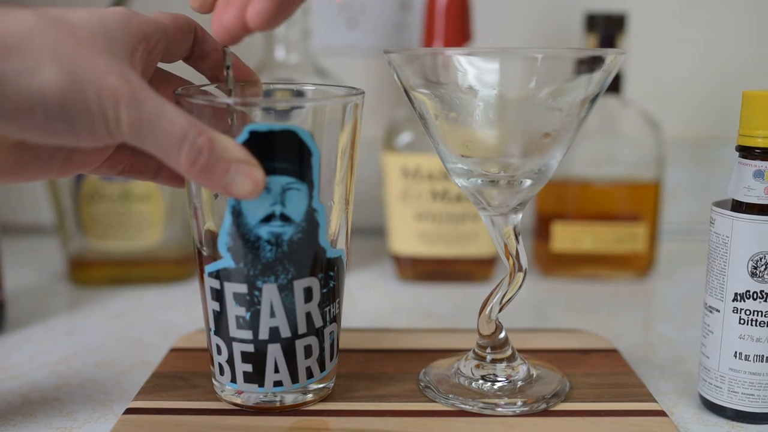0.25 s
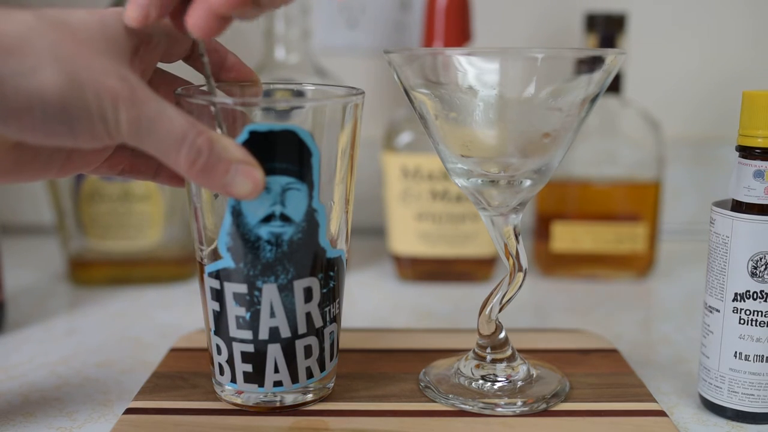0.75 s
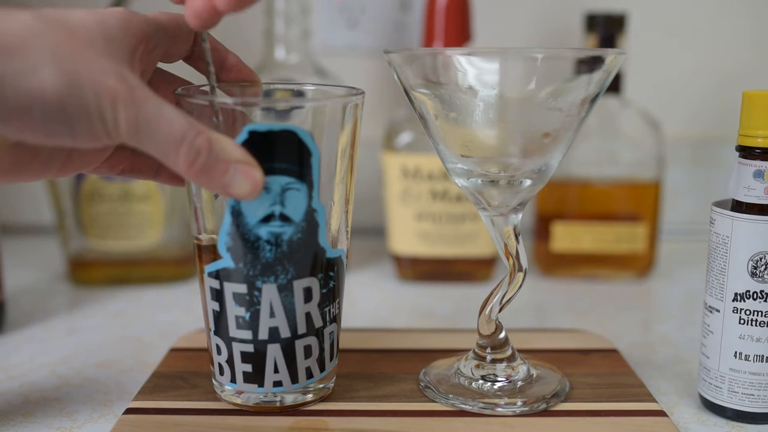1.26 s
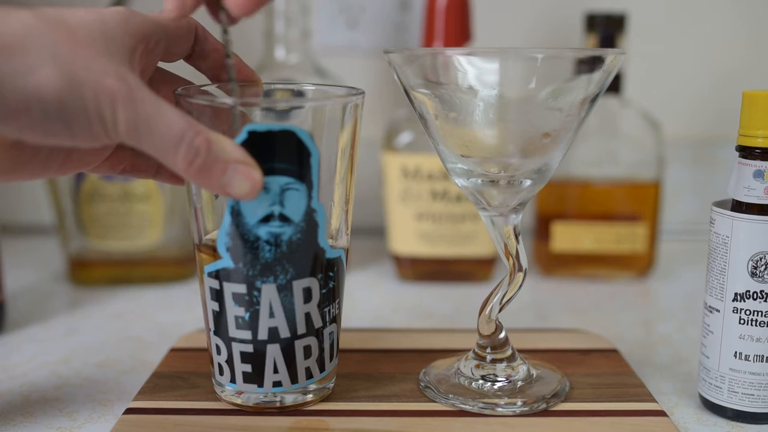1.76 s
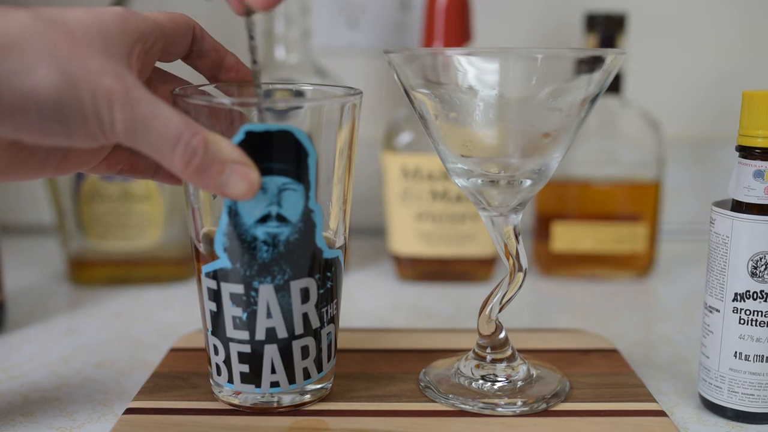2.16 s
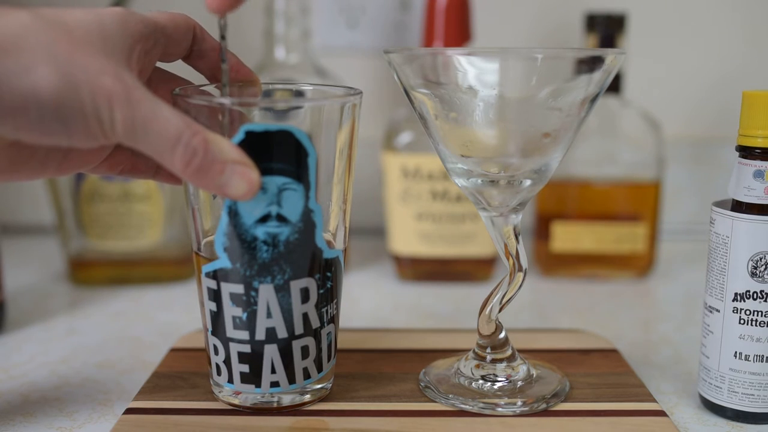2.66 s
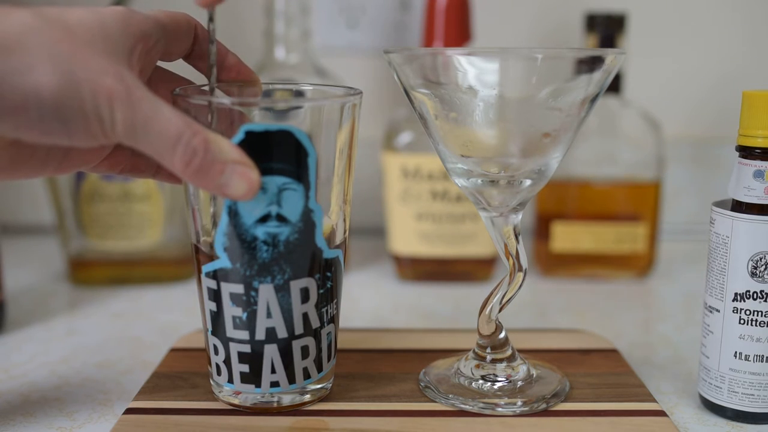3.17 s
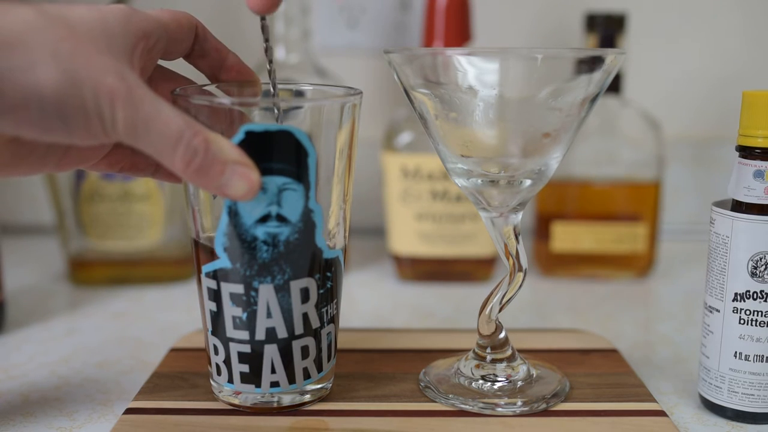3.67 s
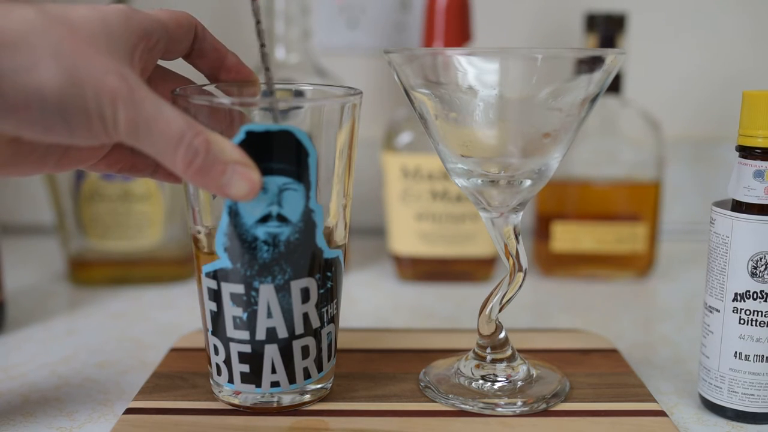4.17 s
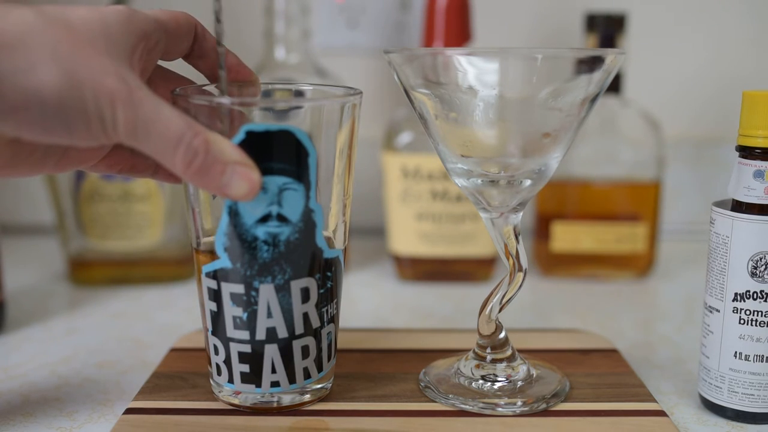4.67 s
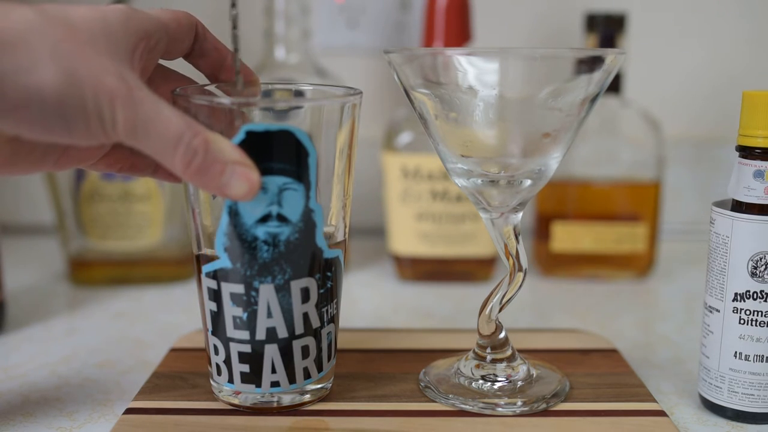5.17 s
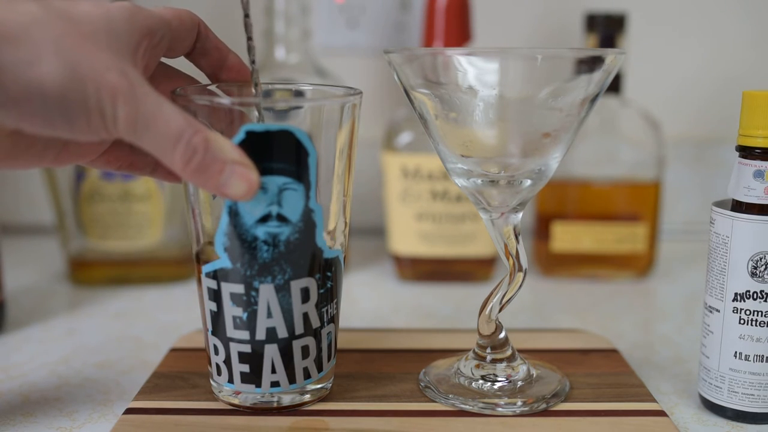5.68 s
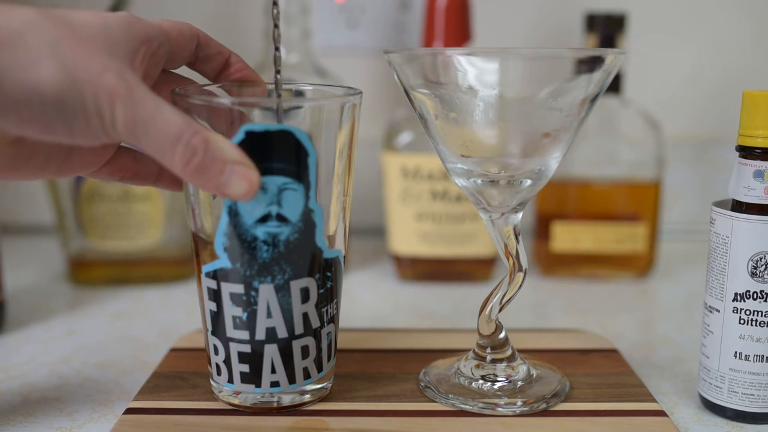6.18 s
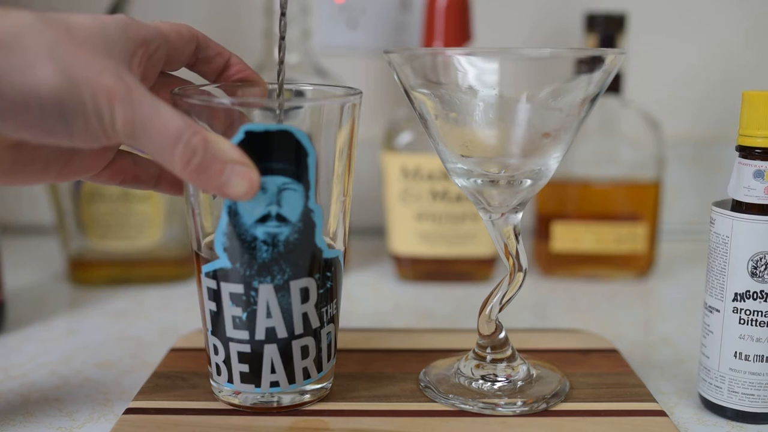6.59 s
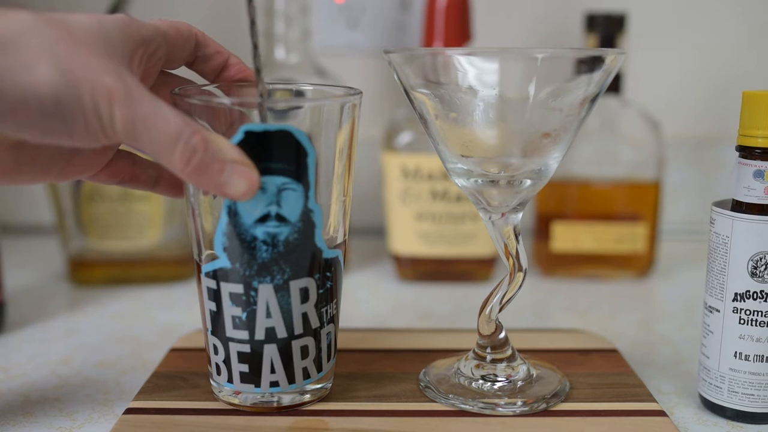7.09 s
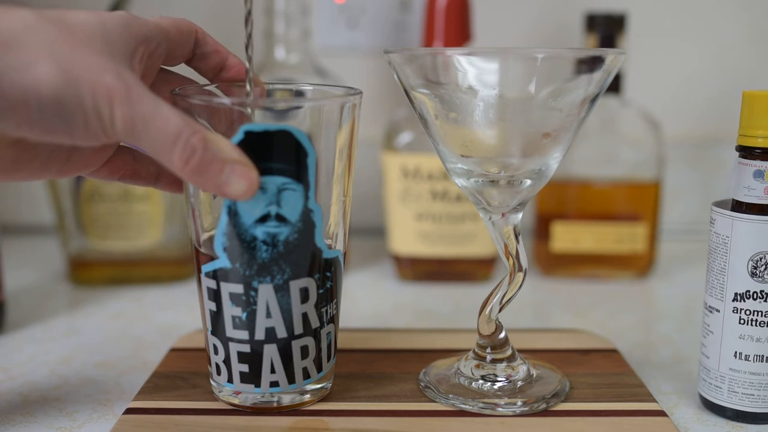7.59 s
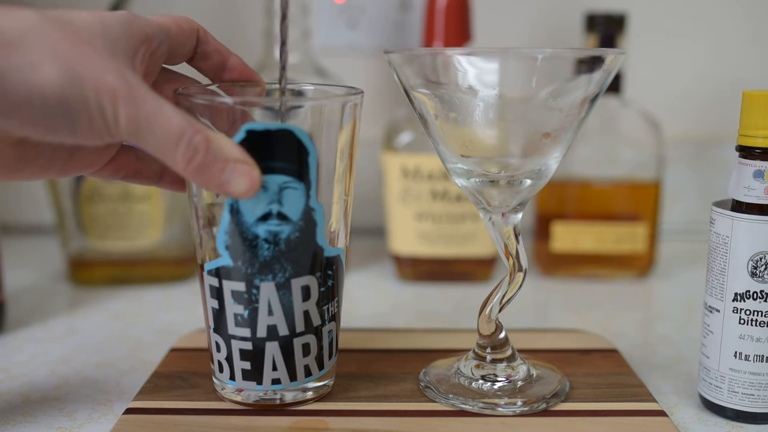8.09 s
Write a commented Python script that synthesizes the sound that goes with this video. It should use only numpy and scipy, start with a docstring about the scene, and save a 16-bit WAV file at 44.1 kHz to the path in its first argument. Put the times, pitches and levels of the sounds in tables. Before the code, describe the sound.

Continuous stirring of ice cubes with a metal spoon: crisp, high clinks on damped glass, fine chattering ticks between cubes, dull little bumps on wood and a few tiny bubble pops. The rhythm is uneven and quick, briefly thinning early on, with the loudest cracks in the last two seconds. Heard close in stereo, in a small reflective room with a short tail and faint hush.

```python
"""In a small hard-walled room, a bar spoon stirs ice cubes in a drink; a hand holds the thick glass on a wooden board.
Each contact cracks, rings the liquid-damped wall of the glass and jolts the board: force spectra drive resonances.
In between, chips tick on the glass and cubes on each other, as random clicks and short decaying sines.
A few air bubbles pop as decaying, rising sines, over a steady hush of coloured noise.
A stereo camera microphone is near; noise tails give the room's answer."""
import sys
import numpy as np
from scipy import signal
from scipy.fft import rfft, irfft, next_fast_len
from scipy.io import wavfile
from scipy.ndimage import uniform_filter1d, minimum_filter1d

SR = 44100
rng = np.random.default_rng(int(sys.argv[2]) if len(sys.argv) > 2 else 0)


def bounce(signal):
    """Save signal as a 16-bit WAV file at the path given by the first command-line argument."""
    frames = np.transpose(np.atleast_2d(signal))
    limited = np.clip(frames, -1, 1)
    pcm = np.round(limited * 32767).astype(np.int16)
    wavfile.write(sys.argv[1], SR, pcm)


N = 367794
SIZE = 2 ** 14  # samples in a response
T = np.arange(SIZE) / SR
HZ = np.fft.rfftfreq(SIZE, 1 / SR)

# ice and spoon against the glass: start_s, strength_db, hardness (dB per octave), bump on the board (dB over strength),
# main ring (dB over strength, set by the place struck), main ring pitch_hz (set by the sloshing drink)
CONTACTS = [(0.0556, -41, -8, 7, -7, 4630), (0.1166, -19.0, 3, -7.5, 1.5, 4975),
            (0.276, -21, -3.0, -17.5, 0, 4690), (0.3121, -32.0, -3.5, -18, 0, 4740),
            (0.3823, -35, -4, 1, 6, 4550), (0.4925, -30.5, -3.5, -9.5, 4.5, 4640),
            (0.625, -39.5, -2.5, 5.5, -1, 4680), (0.7347, -51.5, -4, 7, 0, 4750),
            (0.789, -46.5, -8.5, 4.5, 12.5, 4780), (0.8985, -29, -6, -6, 9, 4720),
            (0.9335, -37.5, -10, 3, 2, 4970), (0.9591, -23.5, -3.5, 0.5, 7.5, 4970),
            (1.0444, -21.5, -0.5, -10, 12.5, 4895), (1.0592, -24, -1, -6.5, 1, 4840),
            (1.0744, -31, 0, -25, 0, 4760), (1.1748, -27, -3, -22, 7, 4850),
            (1.223, -19, -1.5, -14, -5, 4700), (1.3269, -32, -2, -4.5, -4, 4700),
            (1.5126, -48.5, -9, -8, 7, 4760), (1.6145, -37.5, -6.5, -1, -17, 4860),
            (1.7274, -35.5, 3.5, -12, 1, 4650), (1.7624, -25, 8, -0.5, -5, 4650),
            (1.8205, -21.5, 4.5, -10, -10, 4600), (2.042, -17.5, 5.5, -8, -4, 4770),
            (2.3495, -31.5, 1.5, -4, 0.5, 4580), (2.3897, -29.0, 0.5, -12.5, -6, 4760),
            (2.457, -36, -4.5, -28, 3.5, 4470), (2.4923, -22, 5.5, -1, -10, 4600),
            (2.5715, -21, 4, -10, -3.5, 4490), (2.745, -54, -2, 6, -13, 4600),
            (2.8054, -24, -4, -33.5, -17, 4650), (2.869, -16.5, 8.5, -14.5, 13, 4873),
            (2.8856, -31.5, 2, -2.5, 12, 4640), (2.9556, -22, 8, -2.5, -3, 4610),
            (2.9793, -24, 8, -7, 1.5, 4560), (3.057, -29.5, 8.0, -12.5, -3, 4800),
            (3.247, -32.5, 5, -12, -9, 4800), (3.2667, -20, -1.5, -31, -3, 4730),
            (3.291, -38, -7, -8, -17, 4670), (3.3141, -16.5, 4.5, -8, -5.5, 4660),
            (3.33, -24.5, 0.5, -19, -13, 4600), (3.445, -22.5, 5, -11.5, -3.5, 4720),
            (3.6416, -31, 2, -17, 5.5, 4830), (3.6565, -19.5, 5, -7.5, -15, 4870),
            (3.7942, -36.5, 7.5, -5.5, -1, 4570), (3.8436, -20.0, 6.5, -15, -2.5, 4490),
            (4.0346, -21, 2, -11.5, 1, 4710), (4.063, -31, -1, 0.5, -1, 4800),
            (4.0778, -21.0, 0, -14, 1, 4720), (4.1367, -22.5, 1.5, -4, 0.5, 4890),
            (4.212, -21.5, 4, -13.5, -10, 4770), (4.2426, -30.5, 1, -10, -6, 4630),
            (4.3704, -40, 7.5, -4.5, -3, 5000), (4.421, -20.5, 4, -11.5, 1, 4770),
            (4.463, -18, 5, -27, -2, 4750), (4.5025, -24.5, 0, 0.5, -15, 4800),
            (4.614, -21, 6.0, -11, -4.5, 4560), (4.7673, -39, -5.5, -11, 3.5, 4640),
            (4.7997, -23, 1, -19.5, 1.5, 4650), (4.856, -32.5, -3, -12, 4, 4450),
            (4.8817, -33.5, -2, -9, -5, 4560), (4.925, -24, 5.5, -1.5, -5, 4450),
            (5.0102, -21, 8.5, -10, -4.5, 4340), (5.1348, -36.5, 5, -8, -1, 4700),
            (5.1828, -30.0, 3.5, -7.5, 3, 4750), (5.2191, -23.5, -1, -9.5, 4, 4630),
            (5.2803, -21.5, 5, 1.5, -3, 4830), (5.3819, -17, 6, -8, 2.5, 4590),
            (5.5079, -35.0, -2.5, -8, -16, 4430), (5.593, -22.5, 6, -8, 3.5, 4810),
            (5.6126, -31.5, 7, 9, -11, 4800), (5.6805, -39.5, 1, 6, 9, 4670),
            (5.6962, -36.5, -1, 2, 4, 4400), (5.7208, -22.5, 2, -5.5, -3, 4580),
            (5.8504, -27, -1.5, -5, 3, 4740), (5.9712, -16.0, 14.5, -12.5, -2.5, 4660),
            (6.0898, -39, -4.5, -11, 1, 4700), (6.1418, -40, 0.5, -6, 2.5, 4420),
            (6.223, -36.5, -2.5, -5.5, -2, 4730), (6.295, -29.5, 2.0, -7.5, -1, 4590),
            (6.3706, -49, -9.5, -1, -34, 4580), (6.5878, -9, 4, -25, -1, 4720),
            (6.7491, -24.5, -2, -20, 0, 4600), (6.8068, -32, -1.5, -7.5, 0, 4700),
            (6.8318, -29.5, 1, -9, -4, 4810), (6.8549, -36, -0.5, -1, 14.5, 4590),
            (6.9294, -20.5, 4, 4, -0.5, 4790), (6.9832, -24.5, 0.5, -23, -4, 4530),
            (7.0052, -33, -5, -17, 9.5, 4740), (7.039, -26.5, 1.5, 0.5, 8, 4980),
            (7.0684, -24.5, -3, -27, 3.5, 4760), (7.1066, -26.5, 1, -10, 7.5, 4750),
            (7.1618, -34, -3, -9, 0, 4650), (7.182, -26.5, 0.5, -15.5, -1, 4650),
            (7.269, -33, -5.5, -5, -0.5, 4800), (7.377, -11, 5.5, -22.5, 0.5, 4725),
            (7.4394, -31, 1, -12, 6, 4790), (7.4875, -32, -3.5, -5, 4.5, 5000),
            (7.567, -37, -2, 8, -2, 4800), (7.675, -22.5, 3, -11.5, -6, 5220),
            (7.7305, -24.5, 5.5, 1, -1.5, 5000), (7.791, -25, 1.5, -31, 0.5, 4700),
            (7.838, -24, -0.5, -16, -6, 4840), (7.882, -22.5, 3.5, -9, -6, 4630),
            (7.9162, -29.5, 5, -4.5, -1.5, 4720), (8.0066, -33, -5, -15, -2, 4880),
            (8.0428, -26.5, 7.5, -16, -0.5, 4900), (8.055, -30.5, -5.5, -16, 14, 4620),
            (8.1322, -27, -4.5, -24, -2, 4850), (8.1737, -9.5, 3, -30, 4.5, 4754),
            (8.2068, -27, 1.5, -4, -4, 4870), (8.253, -23.5, 6.5, -30, -8, 4780),
            (8.2825, -41, 1, 11.5, -17, 4740), (8.2974, -39.5, -5, -7, 6, 4640)]
# the glass standing on the board: mode_hz, width_hz, level_db
BOARD_MODES = [(219.6, 30.5, 4.5), (372, 38, 6), (529.5, 58, 2), (858.5, 71, 4), (1070, 190, -9.5)]
# brief resonances of the cubes and spoon in the drink: mode_hz, width_hz, level_db
ICE_MODES = [(2343, 46, -1), (3003, 116, -2), (3920, 760, -9.5), (5170, 200, 0.5), (6700, 220, -8)]
# colour of the contact itself: frequency_hz, level (dB per Hz)
CRACK_COLOUR = [(500, -7), (1300, -2.5), (2300, -6), (3000, 1.5), (4200, -3), (5800, -3), (7500, -67),
                (12000, -71)]
# stereo width of room sound: frequency_hz, side over mid (ratio)
STEREO_WIDTH = [(150, 0.17), (600, 0.4), (2000, 0.72), (5000, 1)]


def amp(db):
    """Decibels to gain."""
    return 10 ** (np.asarray(db) / 20)


def unit(x):
    """Scale to rms 1."""
    return x / np.sqrt(np.mean(x ** 2) + 1e-20)


def along(points, hz):
    """Read (Hz, value) points on a log frequency axis."""
    point_hz, value = np.transpose(points)
    return np.interp(np.log(hz + 1), np.log(point_hz + 1), value)


def filtered(x, response):
    """Filter x by a response given as a function of frequency."""
    m = next_fast_len(N + SIZE)
    return irfft(rfft(x, m) * response(np.fft.rfftfreq(m, 1 / SR)), m)[..., :N]


def colour(points):
    """Causal response with the gain of (Hz, dB) points, by folding the cepstrum (minimum phase)."""
    cepstrum = irfft(np.log(amp(along(points, HZ))))
    cepstrum[1:SIZE // 2] *= 2
    cepstrum[SIZE // 2 + 1:] = 0
    return np.exp(rfft(cepstrum))


def resonance(hz, width):
    """Causal response of one mode, with its centre and width in Hz."""
    return 1j * HZ * width / (hz ** 2 - HZ ** 2 + 1j * HZ * width)


def modes(table, detune, scatter_db):
    """One response per contact: the sloshing level detunes the modes, the point of contact weights them."""
    draw = rng.standard_normal((len(CONTACTS), len(table) + 1))
    shift = 1 + detune * draw[:, -1:]
    total = 0
    for k, (hz, width, db) in enumerate(table):
        gain = (-1) ** k * amp(db + scatter_db * draw[:, k:k + 1])  # neighbours alternate in sign
        total = total + gain * resonance(hz * shift, width)
    return total


def room(count, centre_hz, wet_db, early_db=0, early_t60=0.06, gap=0.00048, lag=.00001):
    """Paths to the left and right microphone: direct sound, counter and near walls, then the room's tail (times in s)."""
    # reverberation: frequency_hz, t60_s
    reverb_times = [(400, 0.49), (1000, 0.15), (2800, 0.26), (7300, 0.18), (13000, 0.17)]
    tail = amp(-60 * T / along(reverb_times, centre_hz))
    early = amp(-60 * T / early_t60)
    decay = np.hypot(tail / np.linalg.norm(tail), amp(early_db) * early / np.linalg.norm(early))
    decay = (amp(wet_db) * decay * (1 - np.exp(-T / gap))).astype(np.float32)
    noise = rng.standard_normal((count, 2, SIZE), dtype=np.float32)
    mid, side = rfft(noise * decay).transpose(1, 0, 2)
    side = side * along(STEREO_WIDTH, HZ).astype(np.float32)
    direct = np.exp(2j * np.pi * HZ * lag).astype(np.complex64)  # left hears it slightly before right
    return np.stack([direct + mid + side, direct.conj() + mid - side], axis=1)


def contact_levels():
    """dB of knock, crack, splinter and three wall rings: a harder contact is shorter and tilts towards the treble."""
    # crack, splinter, oval and four-lobe ring: centre_hz, level (dB over strength)
    contact_sounds = [(3240, 1.5), (8960, -9.5), (1810, -1.5), (7380, -3)]
    pivot_hz = 4800  # hardness tilts the sound about this frequency
    crack_from_bump = 0.36  # share of the bump's dB that goes into the crack of the ice
    _, strength_db, hardness, bump_db, ring_db, _ = np.transpose(CONTACTS)
    crack_db, splinter_db, oval_db, four_db = [
        strength_db + db + hardness * np.log2(hz / pivot_hz) for hz, db in contact_sounds]
    crack_db = crack_db + crack_from_bump * bump_db
    return strength_db + bump_db, crack_db, splinter_db, oval_db, strength_db + ring_db, four_db


def crowding(memory_s):
    """How hard the cubes press together: it swells before and fades after each contact, most for strong cracks."""
    start_s, crack_db = np.transpose(CONTACTS)[0], contact_levels()[1]
    time = np.arange(N) / SR
    coarse = time[::256]
    swell = np.exp(-np.abs(coarse[:, None] - start_s) / memory_s)
    return np.interp(time, coarse, swell @ np.sqrt(amp(crack_db)))


def room_tone(level_db=-50.0, side_db=-4):
    """The steady low hush of the room: coloured noise, nearly mono in the bass."""
    # hush colour: frequency_hz, level (dB per Hz)
    hush_colour = [(20, -3.5), (115, 0), (165, -5), (240, 0), (600, -11.5), (2000, -15), (5000, -24),
                   (15800, -32.5)]
    mid = filtered(rng.standard_normal(N), lambda hz: amp(along(hush_colour, hz)))
    side = filtered(rng.standard_normal(N), lambda hz: amp(along(hush_colour, hz)) * along(STEREO_WIDTH, hz))
    side = amp(side_db) * side
    return amp(level_db) * unit(np.array([mid + side, mid - side]))


def bubbles(t60=.085, rise=0.0032, level_db=-1, climb_per_s=0.34):
    """Trapped air rings briefly; its pitch climbs a little as it nears the surface (t60 and rise in s)."""
    # air bubbles under the ice: start_s, level_db (level_db of the layer is added), starting pitch_hz
    bubble_events = [(1.014, -23.5, 1670), (1.827, -21.5, 1120), (1.8687, -19, 1124), (1.962, -37, 1080),
                     (4.193, -28.5, 1100)]
    out = np.zeros(N + SIZE)
    swell = amp(-60 * T / t60) * (1 - np.exp(-T / rise))
    swell = swell / swell.max()
    for start_s, db, hz in bubble_events:
        ring = np.sin(2 * np.pi * hz * T * (1 + climb_per_s * T / 2))
        out[round(start_s * SR):][:SIZE] += amp(db + level_db) * swell * ring
    return out[:N]


def cubes(count=300, pitch_hz=3700, spread=.28, cycles=20, scatter_db=4, level_db=-6, size=512):
    """Cube meets cube away from the wall: very short ticks, each at its own pitch, that leave the glass silent."""
    start = rng.integers(0, N, count)
    draw = np.clip(rng.standard_normal((count, 4)), -2, 2)
    t = T[:size]
    hz = pitch_hz * np.exp(spread * draw[:, :3, None])  # three modes a tick
    fade = amp(-60 * hz * t / cycles)  # 60 dB down after this many cycles
    ticks = np.sum(np.sin(2 * np.pi * hz * t) * fade, axis=1) / 3
    gain = amp(level_db + scatter_db * draw[:, 3]) * crowding(memory_s=0.044)[start] ** 1.49
    ticks *= gain[:, None]
    place = start[:, None] + np.arange(size)
    train = np.bincount(place.ravel(), ticks.ravel(), N + size)[:N]
    paths = irfft(room(count=1, centre_hz=3600, wet_db=-8.5)[0])
    return signal.fftconvolve(train[None], paths, axes=1)[:, :N]


def chips(per_second=46, scatter_db=12.0, crowd_db=-21, idle_db=-49, memory_s=0.052):
    """Light random touches of ice ring glass and board, strongest while the cubes crowd against the wall."""
    strength = amp(scatter_db * np.clip(rng.standard_normal(N), -2, 2))
    ticks = unit((rng.random(N) < per_second / SR) * strength)
    ticks = ticks * (amp(idle_db) + amp(crowd_db) * crowding(memory_s) ** 2)
    glass = colour(CRACK_COLOUR) + amp(19.5) * resonance(1922, width=81)
    glass = glass + amp(7.0) * resonance(4520, width=480) + amp(9) * resonance(7130, width=270)
    for hz, width, db in [*BOARD_MODES, *ICE_MODES]:
        glass = glass + amp(db) * resonance(hz, width)
    glass = glass / (1 + 1j * HZ / 6500) ** 2  # wet, light touches are soft
    answer = irfft(glass * room(count=1, centre_hz=2420, wet_db=3)[0])
    answer = answer / np.linalg.norm(answer[0])
    return signal.fftconvolve(ticks[None], answer, axes=1)[:, :N]


def blows(rebound, rebound_s, scrape, scrape_s, count=3):
    """Force spectrum of each contact: a blow, a short noisy scrape and a few fading rebounds."""
    force = scrape * np.exp(-T / scrape_s) * rng.standard_normal((len(CONTACTS), SIZE))
    force[:, 0] += 1
    draw = rng.uniform(.2, 1.8, (len(CONTACTS), 2, count))
    when = np.cumsum(draw[:, 0] * rebound_s * SR, axis=1).astype(int)
    force[np.arange(len(force))[:, None], when] += draw[:, 1] * rebound ** np.arange(1, count + 1)
    return rfft(force)


def radiate(response, db, centre_hz, wet_db):
    """Each contact's response heard in the room; db is its level if all its energy fell within 20 ms."""
    sound = irfft(response.astype(np.complex64)[:, None] * room(len(db), centre_hz, wet_db))
    power = np.sum(sound ** 2, axis=2).mean(axis=1) / (SR // 50)
    return sound * (amp(db) / np.sqrt(power)).astype(np.float32)[:, None, None]


def clinks(wall_s=.01023, wall_db=-7, light_hz=380):
    """Every contact knocks the board, cracks the ice, and rings three kinds of bending mode of the glass."""
    # wall modes, split by the liquid and the hand: mode_hz, width_hz, level_db
    oval_modes = [(1949, 53, -11), (2002, 69, -14)]
    four_lobe_modes = [(6940, 154, 1.5), (7136, 100, 3), (7350, 195, 0)]
    # brittle top of the contact: frequency_hz, level (dB per Hz)
    splinter_colour = [(3500, -41), (6300, 6), (8000, 0), (8800, 7.5), (10000, 2), (11300, -4.5),
                       (13000, -5), (15800, -30)]
    start_s, *_, three_hz = np.transpose(CONTACTS)
    knock_db, crack_db, splinter_db, oval_db, three_db, four_db = contact_levels()
    force = blows(rebound=0.39, rebound_s=.0035, scrape=0.23, scrape_s=0.0016)
    # the heavy base barely follows the chatter
    thud = blows(rebound=0.31, rebound_s=0.005476, scrape=0.026, scrape_s=0.0069)
    blunt = force / (1 + 1j * HZ / 8000) ** 2  # melting faces spread the blow that bends the wall

    slosh = amp(-11.5) * resonance(760, width=1100)  # the drink adds a broad, dull thud
    board = modes(BOARD_MODES, detune=0.019, scatter_db=1.0) + slosh
    board = board / (1 + 1j * HZ / 2500)  # wood is a soft support
    corner = light_hz * np.sqrt(amp(crack_db - knock_db))[:, None]  # light clicks move no bass, heavy bumps do
    board = board * (1j * HZ / (corner + 1j * HZ)) ** 2

    # each cube has its own colour
    ice = colour(CRACK_COLOUR) * (amp(-10.0) + modes(ICE_MODES, detune=0.023, scatter_db=8.0))

    echo = 1 + amp(wall_db) * np.exp(-2j * np.pi * HZ * wall_s)  # the lowest ring comes back from a near wall
    oval = modes(oval_modes, detune=0.0039, scatter_db=3.5) * echo
    pitch = three_hz[:, None]
    three_lobe = resonance(pitch, width=79)
    three_lobe = three_lobe - amp(-16.5) * resonance(pitch * .965, width=430)
    three_lobe = three_lobe - amp(-16.5) * resonance(pitch * 1.07, width=370)
    four_lobe = modes(four_lobe_modes, detune=0.0063, scatter_db=8)

    hits = radiate(thud * board, knock_db, centre_hz=700, wet_db=3.5)
    hits += radiate(force * ice, crack_db, centre_hz=3220, wet_db=0.0)
    hits += radiate(force * colour(splinter_colour), splinter_db, centre_hz=9500, wet_db=-6.5)
    hits += radiate(blunt * oval, oval_db, centre_hz=2800, wet_db=-3.0)
    hits += radiate(blunt * three_lobe, three_db, centre_hz=5630, wet_db=-1.5)
    hits += radiate(blunt * four_lobe, four_db, centre_hz=7100, wet_db=-6.0)
    out = np.zeros((2, N + SIZE))
    for start, hit in zip(np.round(start_s * SR).astype(int), hits):
        out[:, start:start + SIZE] += hit
    return out[:, :N]


def scene():
    """The stirred glass in its room."""
    return room_tone() + bubbles() + cubes() + chips() + clinks()


def record(dry, ceiling=0.89, size=45, top_hz=15850):
    """The two microphones differ in colour; a fast limiter holds the loudest peaks; then a steep cut at top_hz."""
    # microphone balance: frequency_hz, left minus right (dB)
    left_right = [(60, 1.5), (180, 0), (550, 1), (1650, -2), (4970, 1.5), (15000, 4.5)]
    heard = filtered(dry, lambda hz: amp(np.array([[.5], [-.5]]) * along(left_right, hz)))
    needed = 1 / np.maximum(1, np.abs(heard) / ceiling)
    heard = heard * uniform_filter1d(minimum_filter1d(needed, size), size)  # gain held and smoothed over size samples
    return filtered(heard, lambda hz: hz < top_hz)


dry = scene()
out = record(dry)
bounce(out)
```